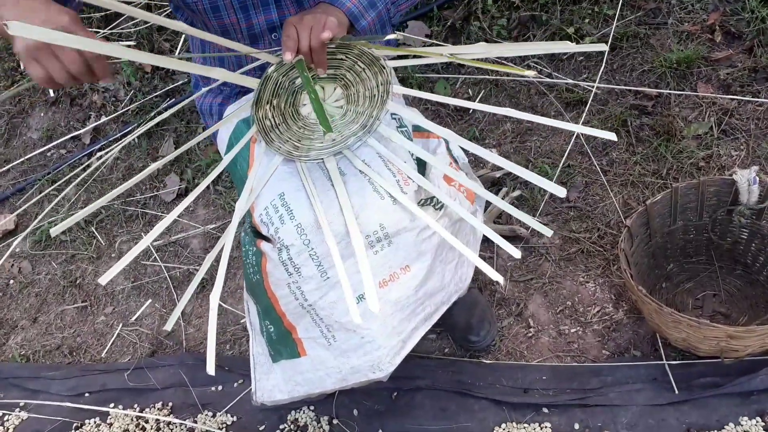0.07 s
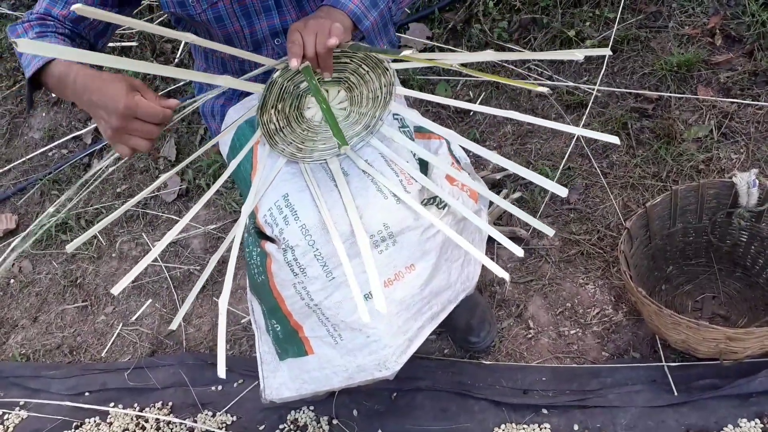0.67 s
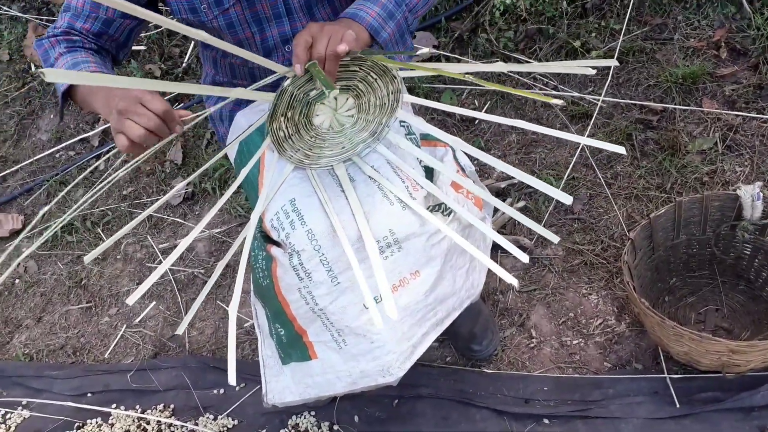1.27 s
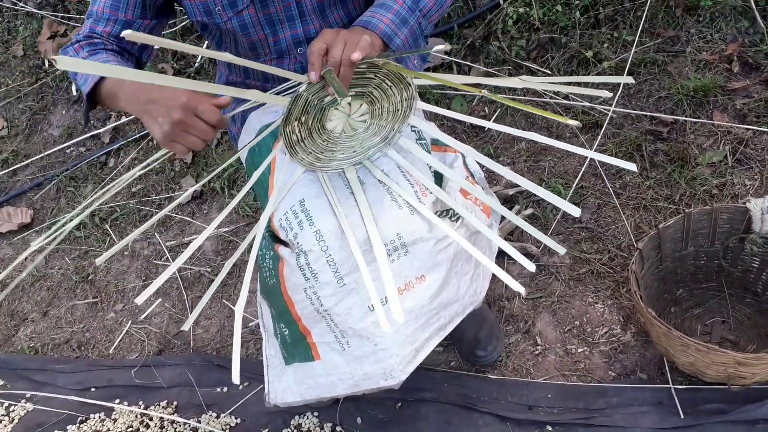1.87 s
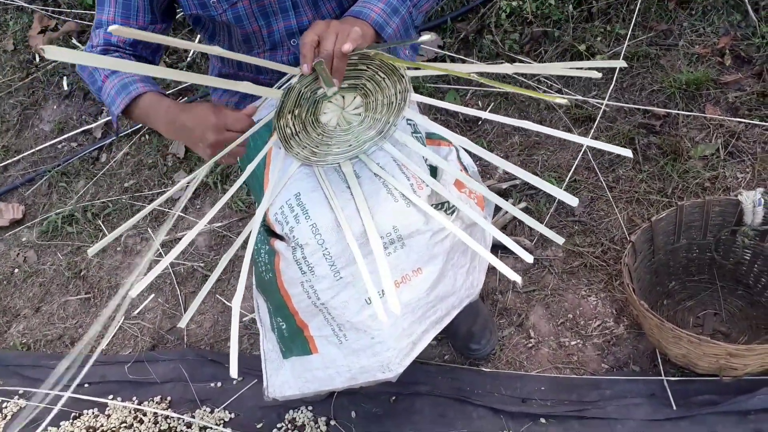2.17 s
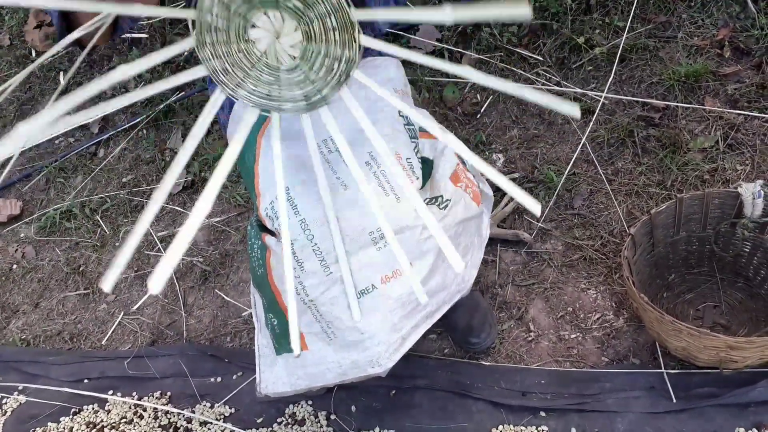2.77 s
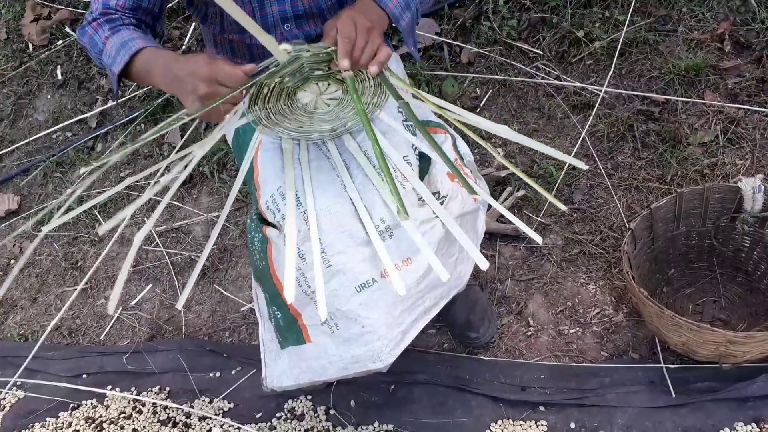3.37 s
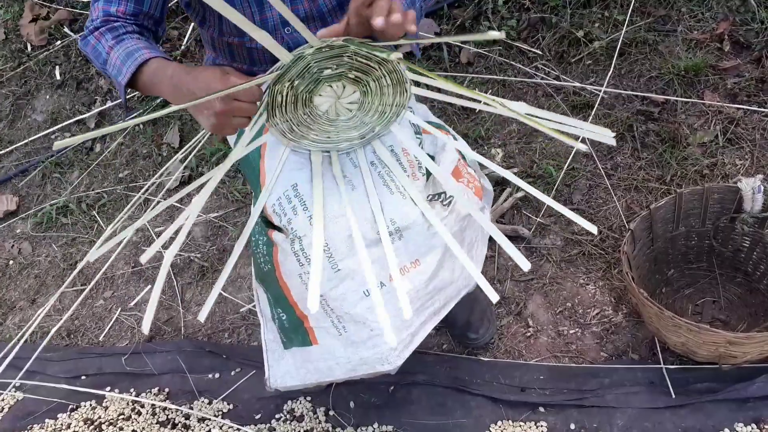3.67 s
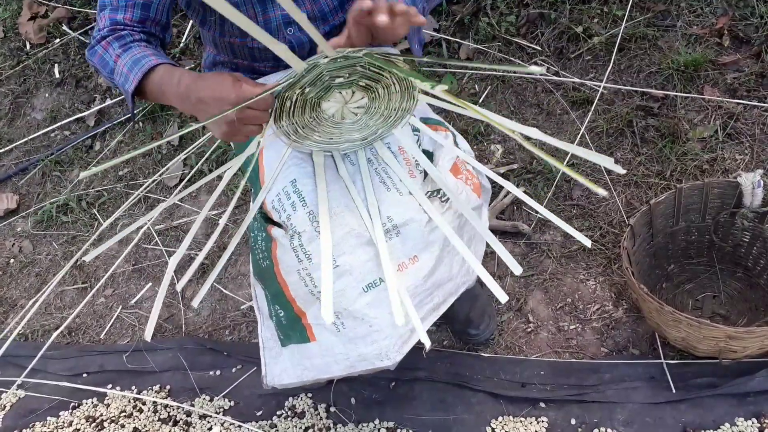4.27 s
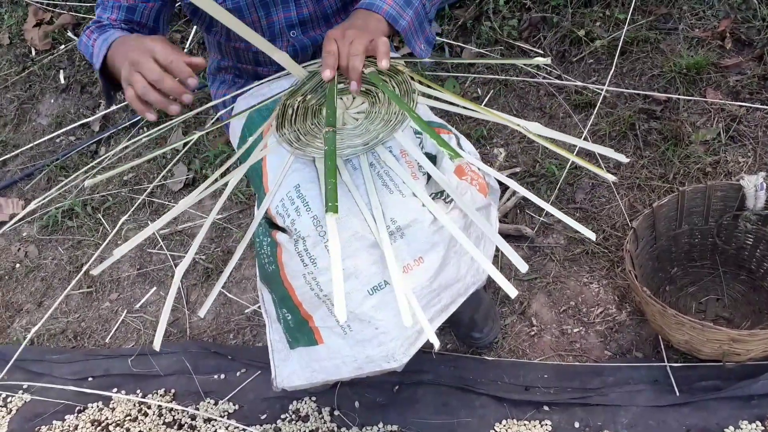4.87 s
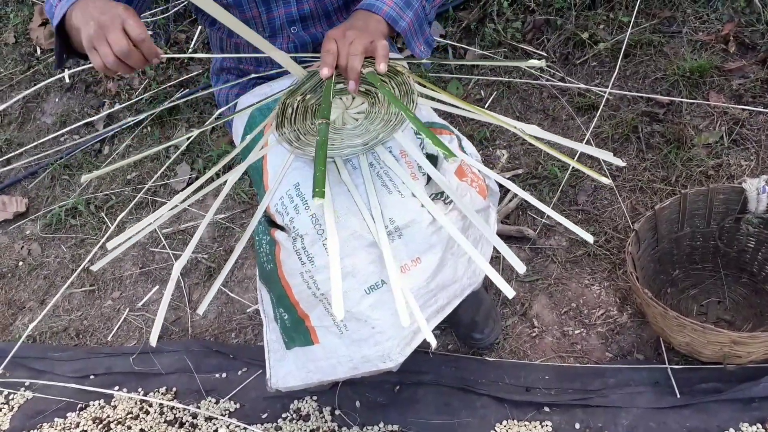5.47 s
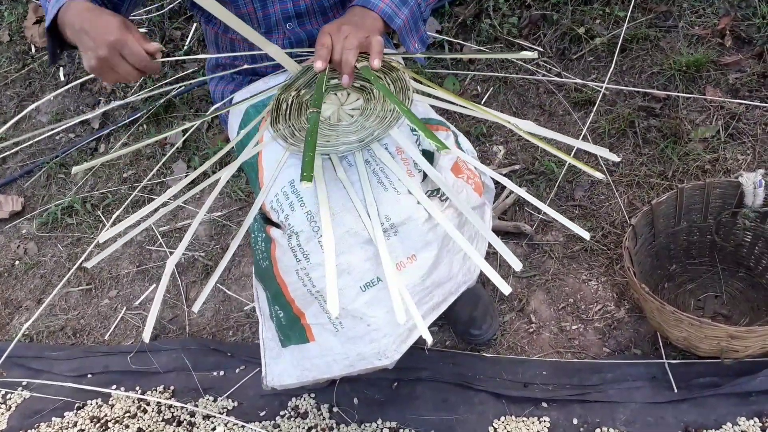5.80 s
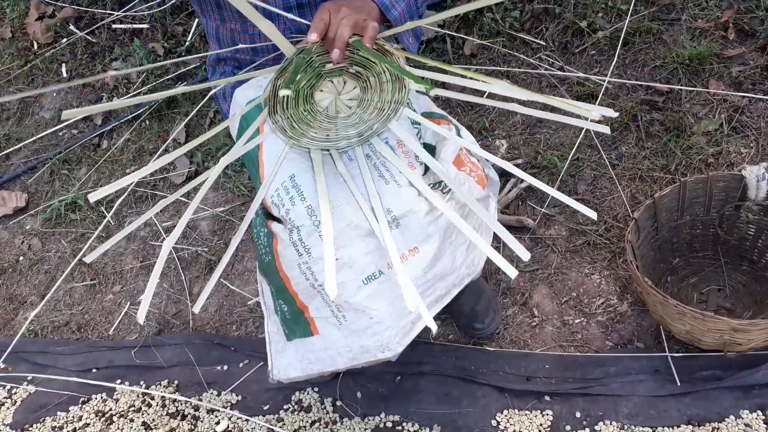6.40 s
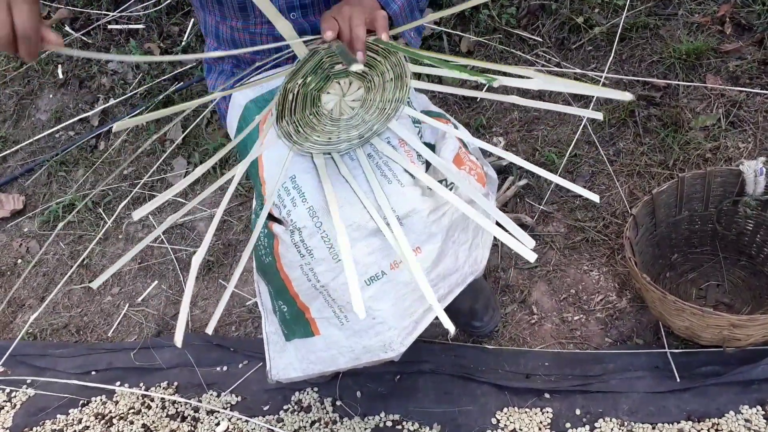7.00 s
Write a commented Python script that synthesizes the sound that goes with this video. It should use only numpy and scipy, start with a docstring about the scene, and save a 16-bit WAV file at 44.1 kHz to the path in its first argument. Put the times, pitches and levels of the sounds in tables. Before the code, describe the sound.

Thin cane strips are woven around a basket base, heard close and in stereo over very quiet outdoor air. From the start there are soft, dry rustles and crisp little ticks as strip ends touch, with a slight creak near 1.2 seconds. Between 1 and 2 seconds a few faint, short tones sink in the distance. A strip is drawn through with a stronger rasp and clicks around 1.7 seconds and again at 2.2. From 2.4 to 3.4 seconds comes the loudest part: the base is lifted, turned and set down on a plastic sack, with hard scraping, woody cracks and hollow bumps, strongest near 2.6 and 2.9 seconds. Another creaking scrape and a soft bump follow around 3.7 seconds. After 4.3 seconds the work turns quiet, with light sliding and scattered ticks near 5.3 seconds and from 6.2 to 7, including one tiny ping.

```python
"""Outdoors, a stereo pair of microphones close to a basket base that rests on a plastic sack.
Thin cane strips are woven round it: they stick and slip as they are drawn through, creak where they
bind, and their ends tick against each other. The base is lifted, turned and set down, scraping,
cracking and bumping. Behind the work lie quiet air and faint, sinking tones from far off."""
import sys
import numpy as np
from scipy import signal
from scipy.fft import rfft, irfft, next_fast_len
from scipy.io import wavfile

SR = 44100
rng = np.random.default_rng(int(sys.argv[2]) if len(sys.argv) > 2 else 0)


def file_out(sig):
    """Save sig as 16-bit WAV at sys.argv[1]."""
    # one column per channel
    cols = np.atleast_2d(sig).T
    # limit, then scale
    lim = np.clip(cols, -1, 1)
    pcm = np.round(lim * 32767).astype(np.int16)
    wavfile.write(sys.argv[1], SR, pcm)


N = 310464


def from_db(db):
    """Decibels to gain."""
    return 10 ** (np.asarray(db) / 20)


def rms_one(x):
    """Scale to unit rms."""
    return x / np.sqrt(np.mean(x ** 2) + 1e-20)


def in_time(rows):
    """Each column of a curve at every sample."""
    s, *columns = np.transpose(rows)
    return [np.interp(np.arange(N) / SR, s, c) for c in columns]


def drift(per_s):
    """A random wander of unit rms that turns `per_s` times a second."""
    knots = rng.standard_normal(4000)
    return rms_one(np.interp(np.arange(N) / SR * per_s, np.arange(len(knots)), knots))


def add(out, s, sound):
    """Mix a short sound in at its time."""
    at = int(s * SR)
    out[:, at:at + sound.shape[1]] += sound[:, :N - at]


def gain_at(points, size):
    """Gain of a curve (f/Hz, level/dB) at the bins of a transform of this size."""
    hz, db = np.transpose(points)
    grid = np.maximum(np.arange(size // 2 + 1) * SR / size, 1)
    return from_db(np.interp(np.log(grid), np.log(hz), db))


def colour(x, points, size=4096):
    """Minimum-phase filter that follows a curve (f/Hz, level/dB)."""
    cepstrum = irfft(np.log(gain_at(points, size)))
    cepstrum[1:size // 2] *= 2
    cepstrum[size // 2 + 1:] = 0
    impulse = irfft(np.exp(rfft(cepstrum)))
    x = np.atleast_2d(x)
    return signal.oaconvolve(x, impulse[None], axes=1)[:, :x.shape[1]]


def resonate(x, hz, width_hz):
    """Two-pole resonance with gain 1 at its peak."""
    r = np.exp(-np.pi * width_hz / SR)
    feedback = [1, -2 * r * np.cos(2 * np.pi * hz / SR), r * r]
    return signal.lfilter(np.array([1, 0, -1]) * (1 - r * r) / 2, feedback, x + 1e-18)


# Left microphone against right: f/Hz, level/dB
MIC_BALANCE = [(100, -6), (600, -7.5), (1050, -8), (1500, -14.5), (2200, -18), (3200, -10), (5300, -9),
               (7000, -10.5), (9000, -2), (11500, 1.5), (16000, -1.5)]
# Width of the pair, side against mid: f/Hz, level/dB
MIC_WIDTH = [(150, -13.5), (400, -9.5), (900, -6.5), (1800, -4), (3000, 0), (16000, -1)]
def microphones(pair):
    """Two unrelated signals become left and right: alike in the bass, each side with its own colour."""
    size = 2 * next_fast_len(pair.shape[1] // 2 + 1)
    mid, side = rfft(pair, size)
    side = side * gain_at(MIC_WIDTH, size)
    lean = gain_at(MIC_BALANCE, size)
    left_right = np.array([lean * (mid + side), mid - side]) / np.hypot(1, lean)
    return irfft(left_right, size)[:, :pair.shape[1]]


# Spectrum of the background, all round the microphones: f/Hz, level/dB
AIR_SPECTRUM = [(25, -13.5), (100, 5), (300, -1), (500, 1), (1000, -17), (1700, -1), (2500, -2), (3300, -7),
                (4400, 1.5), (6500, 2), (11000, -9), (16000, -11.5)]
def air(level_db=-68.5, waver_db=3):
    """Quiet outdoor air and microphone hiss, wavering a little."""
    hush = rms_one(colour(microphones(rng.standard_normal((2, N))), AIR_SPECTRUM))
    return from_db(level_db + waver_db * drift(per_s=10)) * hush


def slips(per_s, spread_db, clump_db, smooth):
    """Stick-slip: tiny jerks of uneven size that come in clumps, over smooth friction."""
    born = rng.random(N) < per_s / SR
    sizes = from_db(spread_db * np.minimum(rng.exponential(1, N), 4))
    jerks = rms_one(born * sizes * rng.standard_normal((2, N)))
    return (jerks + smooth * rng.standard_normal((2, N))) * from_db(clump_db * drift(per_s=130))


def crackle(per_s, ring_s):
    """Single fibres let go now and then, each with a tiny burst."""
    born = (rng.random(N) < per_s / SR) * rng.random(N) ** 2
    bursts = signal.lfilter([1], [1, -np.exp(-1 / (ring_s * SR))], born + 1e-18)
    return rms_one(bursts * rng.standard_normal((2, N)))


# Resonances of the woven base: f/Hz, width/Hz, level/dB
BASE_RESONANCES = [(224, 29, -9.5), (248.2, 24, 2.5), (310.2, 61, 9), (353, 11, 4.5), (640, 370, 5.5),
                   (1149, 300, -7.5)]
# Its broad response, heard close: f/Hz, level/dB
BASE_SPECTRUM = [(50, -17), (120, -4), (230, 0.5), (340, 1.5), (450, -6), (1050, -11.5), (1400, -11.5),
                 (3000, -61.5)]
def base(force):
    """The woven disc answers with a few hollow, well-damped resonances."""
    rings = sum(from_db(db) * resonate(force, hz, width) for hz, width, db in BASE_RESONANCES)
    return colour(force + rings, BASE_SPECTRUM)


# Resonances of a rubbed strip: f/Hz, width/Hz, level/dB
STRIP_RESONANCES = [(1467, 190, -1), (2010, 160, 2.5), (2430, 150, 3), (2900, 130, -2.5), (3690, 660, -1)]
# Its rasp, heard close: f/Hz, level/dB
RASP_SPECTRUM = [(400, -23.5), (1000, -2.5), (2200, 3), (4200, -11.5), (5500, -33.5), (9000, -15)]
def strip(force, broad, stiffness):
    """A strip rings in a few bending resonances, higher if it is stiffer, over a broad response."""
    rings = sum(from_db(db) * resonate(force, hz * stiffness, width)
                for hz, width, db in STRIP_RESONANCES)
    return colour(broad * force + rings, RASP_SPECTRUM)


def ribbed(x, pressure, decay_s=.006):
    """Pressed together, the canes pass waves to and fro, which combs the sound into fine, steady ribs."""
    t = np.arange(SR // 25) / SR
    returns = rms_one(rng.standard_normal(len(t)) * np.exp(-t / decay_s)) / np.sqrt(len(t))
    share = .5 * pressure
    return (x + share * signal.oaconvolve(x, returns[None], axes=1)[:, :N]) / np.hypot(1, share)


# A strip is drawn or the base shifted, near the microphones:
# peak t/s, swell/s, fade/s, base level/dB, rasp level/dB, hiss level/dB
HAND_STROKES = [(.225, 0.12, 0.21, -71.5, -64.5, -61), (.38, 0.079, 0.079, -66, -62.5, -61),
                (.54, 0.14, 0.12, -74, -65.5, -59), (.72, 0.022, 0.065, -85, -67.5, -61.5),
                (1.038, 0.19, 0.088, -66.5, -59.5, -56.5), (1.219, 0.12, 0.055, -59, -56.5, -58.5),
                (1.65, 0.045, 0.1, -64, -55.5, -59), (1.74, 0.05, 0.2, -56.5, -47.5, -49),
                (1.833, 0.073, 0.073, -54.5, -48, -46.5), (2.204, 0.063, 0.11, -61, -53.5, -51),
                (2.3, 0.08, 0.13, -84, -54, -55), (2.385, 0.069, 0.28, -53, -48, -52),
                (2.561, 0.11, 0.017, -33, -26.5, -32.5), (2.6, 0.026, 0.026, -48, -61, -63),
                (2.825, 0.0055, 0.2, -34.5, -38, -49), (2.902, 0.046, 0.062, -30, -29, -35),
                (2.998, 0.034, 0.03, -68, -41, -39), (3.049, 0.1, 0.03, -51, -42, -53),
                (3.227, 0.094, 0.074, -51.5, -41, -50), (3.32, 0.076, 0.11, -41.5, -40, -46),
                (3.676, 0.12, 0.14, -45, -36.5, -38), (3.753, 0.12, 0.01, -42, -51, -47.5),
                (4.028, 0.1, 0.11, -57.5, -50.5, -61), (4.215, 0.065, 0.065, -56.5, -51, -57),
                (5.305, 0.032, 0.06, -58, -54, -56), (5.391, 0.052, 0.04, -65, -55, -56),
                (5.97, 0.014, 0.054, -68.5, -61, -62), (6.235, 0.12, 0.084, -77, -58.5, -60),
                (6.442, 0.026, 0.076, -72.5, -54, -57.5), (6.493, 0.024, 0.036, -71, -58, -56),
                (6.825, .012, 0.26, -85, -59.5, -59), (6.94, 0.15, 0.2, -58.5, -53.5, -63.5)]
# Faint rustle of hands that never quite rest: t/s, level/dB
HAND_RUSTLE = [(0, -71), (.8, -78.5), (1.1, -64.5), (1.45, -70), (1.95, -64), (2.1, -77), (3.45, -63),
               (4.3, -69), (4.5, -70), (5.15, -77), (5.6, -74.5), (5.88, -77), (6.15, -72.5), (6.72, -77.5)]
def friction_db(roundness=1.464):
    """Levels of base, rasp and hiss: strokes rise 20 dB in their swell time and fade, over the rustle."""
    t = np.arange(N) / SR
    rustle_db, = in_time(HAND_RUSTLE)
    power = from_db(rustle_db + np.array([[-5], [-3], [-.5]])) ** 2  # base, rasp, hiss
    for s, swell_s, fade_s, *levels_db in HAND_STROKES:
        away = np.maximum((s - t) / swell_s, (t - s) / fade_s)
        near = away < 2
        swell = from_db(-20 * away[near] ** roundness)  # roundness 1 is pointed, 2 a bell
        power[:, near] += np.outer(from_db(levels_db), swell) ** 2
    return 10 * np.log10(power)


# Hiss of the fibres, heard close: f/Hz, level/dB
HISS_SPECTRUM = [(1000, -32.5), (3000, -6), (4600, 0), (5500, -0.5), (7000, 2.5), (9000, 0), (11000, -13.5),
                 (16000, -37.5)]
# Glassy top of the cane's hard skin: f/Hz, level/dB
SKIN_SPECTRUM = [(3000, -31.5), (8000, -11), (10500, -2.5), (12500, 5.5), (16000, 1)]
# That top against the hiss, highest while loose strips slide over each other: t/s, level/dB
SKIN_GLITTER = [(.2, 3), (.6, 1.5), (1.25, -4), (2.25, 2), (2.55, -6.5), (3.7, -2.5), (4.1, -5),
                (5.3, -5.5), (6.2, -1.5), (7.0, -0.5)]
def rubbing():
    """Friction shakes the base, rasps along the strips and hisses in their fibres."""
    base_db, rasp_db, hiss_db = friction_db()
    glitter_db, = in_time(SKIN_GLITTER)
    hollow = rms_one(base(microphones(slips(per_s=900, spread_db=2.2, clump_db=.95, smooth=.8))))
    # light rubbing lets the strips ring and single fibres crackle; hard pressing blends them into a rasp
    pressure = np.interp(rasp_db, [-62, -42], [0, 1])
    broad = .14 + .42 * pressure
    loose = lambda: (.65 - .3 * pressure) * crackle(per_s=70, ring_s=.0018)
    force = microphones(rms_one(slips(per_s=1200, spread_db=2.3, clump_db=1.2, smooth=.93)) + loose())
    # the contact wanders between a slack, a middling and a taut strip
    touch = from_db([9 * drift(per_s=12) for _ in range(3)])
    touch /= np.sqrt(np.sum(touch ** 2, axis=0))
    rasp = sum(strip(force * share, broad, stiffness) for share, stiffness in zip(touch, [.95, 1, 1.04]))
    rasp = rms_one(rasp) / (.93 + broad)
    fibres = microphones(rms_one(slips(per_s=2400, spread_db=1.6, clump_db=1.6, smooth=.8)) + loose())
    hiss = rms_one(colour(fibres, HISS_SPECTRUM))
    hiss += from_db(glitter_db) * rms_one(colour(fibres, SKIN_SPECTRUM))
    return (hollow * from_db(base_db) + ribbed(rasp, pressure) * from_db(rasp_db)
            + ribbed(hiss, pressure) * from_db(hiss_db))


SKIN_TOP_HZ, SKIN_WIDTH_HZ = 14700, 620  # highest ring of a splinter or snap; width of each ring
def splinters(per_s=110, pitches=6, ring_s=.0007, spread_db=23, above_hiss_db=16):
    """Loose fibres give tiny dry ticks as the strips slide; the highest follow the glitter."""
    hiss_db = np.minimum(friction_db()[2], -60)  # harder rubbing makes them no louder
    glitter_db, = in_time(SKIN_GLITTER)
    grit = microphones(rng.standard_normal((2, N)))
    out = np.zeros((2, N))
    for hz, height in zip(np.geomspace(4500, SKIN_TOP_HZ, pitches), np.linspace(0, 1, pitches)):
        born = (rng.random(N) < per_s / pitches / SR) * from_db(-spread_db * rng.random(N))
        bursts = signal.lfilter([1], [1, -np.exp(-1 / (ring_s * SR))], born + 1e-18)
        out += rms_one(resonate(grit, hz, SKIN_WIDTH_HZ)) * bursts * from_db(height * glitter_db)
    return out * from_db(hiss_db + above_hiss_db)


def flick(level_db, sounding, tail_db, rise_s=.0013):
    """Ragged slips, then a short shiver, drive the part that sounds; level is its energy over 7.5 ms."""
    t = np.arange(SR // 15) / SR
    age = t / rise_s
    burst = age * np.exp(1 - age)
    shiver = from_db(tail_db) * np.minimum(age, 1) * np.exp(-t / .024)
    ragged = from_db(3.5 * np.repeat(rng.standard_normal(len(t)), 16)[:len(t)])
    force = microphones(rng.standard_normal((2, len(t))) * ragged * (burst + shiver))
    return from_db(level_db) * rms_one(sounding(force)) * np.sqrt(.0075 * SR / len(t))


# Resonances of struck cane: f/pitch, width/pitch, level/dB
STRUCK_RESONANCES = [(.66, 0.28, -5.5), (.93, 0.13, 1.5), (1.08, 0.14, 0), (1.8, 0.41, -11)]
def struck(force, pitch_hz):
    """Struck cane gives one dry, quickly damped ring, a little different with each place of contact."""
    rings = 0
    for k, (multiple, width, db) in enumerate(STRUCK_RESONANCES):
        gain = (-1) ** k * from_db(db + 2 * rng.standard_normal())
        hz = pitch_hz * multiple * from_db(rng.standard_normal() / 2)
        rings += gain * resonate(force, hz, pitch_hz * width)
    band = signal.butter(1, [pitch_hz * .65, pitch_hz * 1.35], "band", fs=SR, output="sos")
    return signal.sosfilt(band, rings)


# Strips flicking past each other, close by:
# t/s, rise/ms, crisp level/dB (before its trim), woody level/dB, snap level/dB
STRIP_FLICKS = [(0.1762, 2.3, -37, -59, -38.5), (0.306, 2, -50, -58, -46.5), (0.358, 1.5, -43, -46.5, -53),
                (0.467, 4.9, -49.5, -58.5, -62), (0.4925, .5, -49, -70, -51), (0.513, 2.1, -47.5, -57, -57),
                (0.693, 2.1, -52, -57, -62), (0.85, 3.1, -51, -56.5, -59.5), (0.9998, 2.2, -47, -54, -50.5),
                (1.146, 5.4, -46, -58.5, -52.5), (1.4829, 1.1, -50.5, -83, -57),
                (1.6082, 2.6, -42.5, -55, -49), (1.6435, 2.2, -43, -50, -49.5),
                (1.7152, 2.5, -30, -36.5, -31), (1.871, 1.6, -40, -66, -39.5),
                (2.1531, 1.8, -34.5, -50, -43.5), (2.2019, 3.6, -36, -42.5, -41),
                (2.29, 4.4, -41.5, -50, -48.5), (2.349, 1.4, -45.5, -43.5, -54),
                (2.821, 0.84, -33.5, -36, -40), (2.876, 1, -30, -49, -36), (3.125, 1.2, -50, -76, -50.5),
                (4.1802, 1.8, -52.5, -57.5, -49), (4.652, .8, -52.5, -68, -61),
                (5.2765, 2.5, -44, -66.5, -60), (5.452, 3, -50, -69, -76.5),
                (6.816, 1.4, -49.5, -72, -58.5)]
def ticks(crisp_trim_db=-6.5, ring_hz=2390, db_per_octave=51.5, ping_s=6.8195):
    """Flicks ring woody, click crisply and snap brightly off the hard skin; a free end pings once."""
    out = np.zeros((2, N))
    tip = lambda force: resonate(force, hz=6510, width_hz=440)
    crisp = lambda force: colour(force + from_db(-12) * tip(force), HISS_SPECTRUM)
    for s, rise_ms, crisp_db, woody_db, snap_db in STRIP_FLICKS:
        rise_s = rise_ms / 1000
        # the more the snap outweighs the woody ring, the higher that ring
        pitch_hz = ring_hz * 2 ** np.clip((snap_db - woody_db) / db_per_octave, -1, 1)
        add(out, s, flick(woody_db, lambda force: struck(force, pitch_hz), tail_db=-19.5, rise_s=rise_s))
        add(out, s, flick(crisp_db + crisp_trim_db, crisp, tail_db=-17, rise_s=rise_s))
        skin_hz = rng.uniform(9000, SKIN_TOP_HZ)
        skin = lambda force: colour(force + 2 * resonate(force, skin_hz, SKIN_WIDTH_HZ), SKIN_SPECTRUM)
        add(out, s, flick(snap_db, skin, tail_db=-30.5, rise_s=rise_s))
    add(out, ping_s, flick(-42.5, tip, tail_db=-22))
    return out


# Tones from far off, a little to the right: t/s, length/s, first f/Hz, last f/Hz, level/dB
DISTANT_TONES = [(1.034, .125, 428, 418, -64.5), (1.151, 0.19, 402, 342, -55.5),
                 (1.276, 0.39, 351, 330.4, -66), (1.723, 0.12, 342.7, 305, -52.5),
                 (1.95, 0.15, 340, 330, -65), (1.95, 0.242, 680, 598, -74), (2.713, 0.092, 525, 513, -66.5),
                 (4.803, 1.66, 763, 722, -86.5), (5.536, 0.32, 1653, 1626, -79)]
def far_tones(waver_hz=20, flutter_db=3):
    """Faint tones swell and fade as they sink, blurred and fluttering on their way."""
    out, t = np.zeros(N), np.arange(N) / SR
    for s, length_s, first_hz, last_hz, db in DISTANT_TONES:
        progress = np.clip((t - s) / length_s, 0, 1)
        hz = first_hz + (last_hz - first_hz) * progress + waver_hz * drift(per_s=110)
        tone = np.sin(2 * np.pi * np.cumsum(hz) / SR)
        out += np.sin(np.pi * progress) * tone * from_db(db + flutter_db * drift(per_s=45))
    return out * from_db([[-1], [2]])


# Strips binding in the weave, close by: t/s, length/s, f/Hz, width/Hz, level/dB
STRIP_CREAKS = [(1.146, 0.18, 1374, 65, -65.5), (1.167, .13, 1950, 200, -69.5),
                (2.532, 0.039, 2410, 320, -30.5), (3.61, .12, 1990, 340, -43),
                (3.647, 0.13, 690, 109.3, -55), (4.76, 0.065, 1924, 170, -63.5),
                (6.202, 0.064, 2100, 282, -63)]
def creaks(slips_per_s=420):
    """A binding strip slips in quick jerks that keep one of its resonances ringing."""
    out = np.zeros((2, N))
    t = np.arange(SR // 4) / SR
    for s, length_s, hz, width_hz, db in STRIP_CREAKS:
        swell = np.sin(np.pi * np.minimum(t / length_s, 1))
        jerks = rng.random(len(t)) < slips_per_s / SR
        force = microphones(jerks * swell * rng.standard_normal((2, len(t))))
        ring = resonate(resonate(force, hz, width_hz), hz, hz / 2)
        add(out, s, from_db(db) * rms_one(ring) * np.sqrt(length_s * SR / len(t)))
    return out


# The weave under load, close by: t/s, level/dB, ring f/Hz
WEAVE_CRACKS = [(2.4522, -32, 2280), (2.5007, -39, 2000), (2.5174, -32, 1780), (2.527, -38, 1850),
                (2.5433, -40, 2510), (2.554, -31, 2410), (2.5625, -38.5, 2370), (2.847, -44, 2080),
                (2.8685, -26.5, 1680), (2.8865, -28, 2150), (2.9045, -28, 2160), (3.1878, -40, 2350),
                (3.233, -36, 1850), (3.283, -40, 2300), (3.3365, -35.5, 1930), (3.3614, -55, 1810),
                (3.448, -50, 2320), (3.5827, -43, 2060), (3.8305, -38, 2200), (4.2454, -56, 2120),
                (7.016, -63.5, 2560)]
def cracks(edge_db=-15):
    """Bent or pulled hard, the weave gives way in separate woody cracks with a treble edge."""
    out = np.zeros((2, N))
    edge = lambda force: from_db(edge_db) * rms_one(colour(force, HISS_SPECTRUM))
    for s, db, pitch_hz in WEAVE_CRACKS:
        wood = lambda force: rms_one(struck(force, pitch_hz)) + edge(force)
        add(out, s, flick(db, wood, tail_db=-22.5))
    return out


# The base coming down on the sack, a little to the right: t/s, level/dB
BASE_BUMPS = [(2.557, -23), (2.822, -31), (2.894, -15.5), (2.929, -18), (3.234, -27), (3.753, -37.5),
              (4.033, -46.5)]
def bumps(contact_s=.0027):
    """Each soft push sets the woven base ringing."""
    times, levels_db = np.transpose(BASE_BUMPS)
    force = np.zeros(N)
    force[(times * SR).astype(int)] = from_db(levels_db)
    push = np.hanning(int(contact_s * SR) + 3)
    thud = base(np.convolve(force, push)[:N])
    return thud / np.abs(thud).max() * from_db(levels_db.max() + np.array([[-1.2], [1.2]]))


# The rim as the base is handled, close by: t/s, level/dB
RIM_KNOCKS = [(2.8215, -47.5), (2.869, -35), (2.906, -38), (3.2335, -46.5), (3.753, -49.5)]
def knocks(pitch_hz=871):
    """The stiff rim gives short, hollow knocks."""
    out = np.zeros((2, N))
    for s, db in RIM_KNOCKS:
        add(out, s, flick(db, lambda force: struck(force, pitch_hz), tail_db=-32))
    return out


def scatter(x, t60_s, wet_db):
    """The ground and the things around send back a brief, diffuse tail, starting 4 ms late."""
    t = np.arange(SR // 3) / SR
    tail = rng.standard_normal((2, len(t))) * from_db(-60 * t / t60_s) * (t > .004)
    tail /= np.sqrt(np.sum(tail ** 2, axis=1, keepdims=True))
    return x + from_db(wet_db) * signal.oaconvolve(x, tail, axes=1)[:, :N]


# Shift of the work between the microphones, left against right: t/s, level/dB
WORK_PAN = [(0, 1), (2.6, 3.5), (4.4, 2)]
def scene():
    """The weaving close to the microphones, the air and the far tones behind it."""
    pan_db, = in_time(WORK_PAN)
    weaving = rubbing() + creaks() + ticks() + cracks() + knocks() + splinters()
    weaving *= from_db([pan_db / 2, -pan_db / 2])
    return scatter(weaving, t60_s=.062, wet_db=-11.5) + bumps() + far_tones() + air()


def record(dry, cutoff_hz=16000):
    """A steep low-pass cuts the top of both channels."""
    return signal.sosfilt(signal.ellip(10, .1, 80, cutoff_hz, fs=SR, output="sos"), dry)


dry = scene()
out = record(dry)
file_out(out)
```